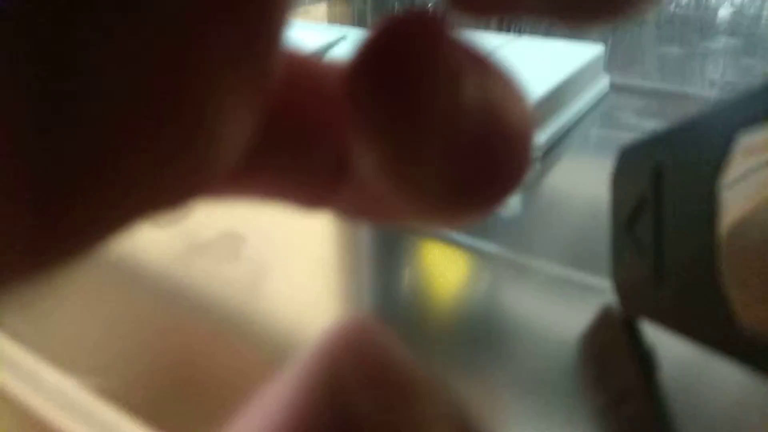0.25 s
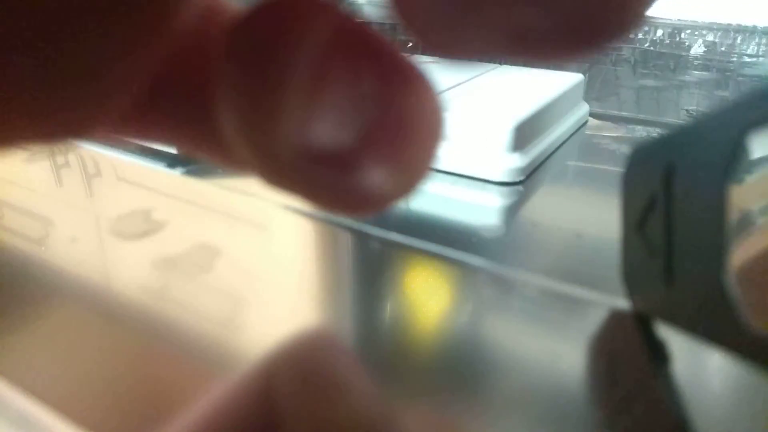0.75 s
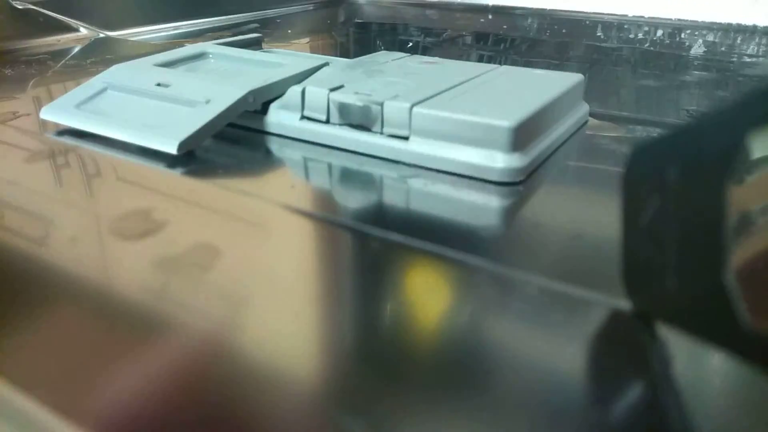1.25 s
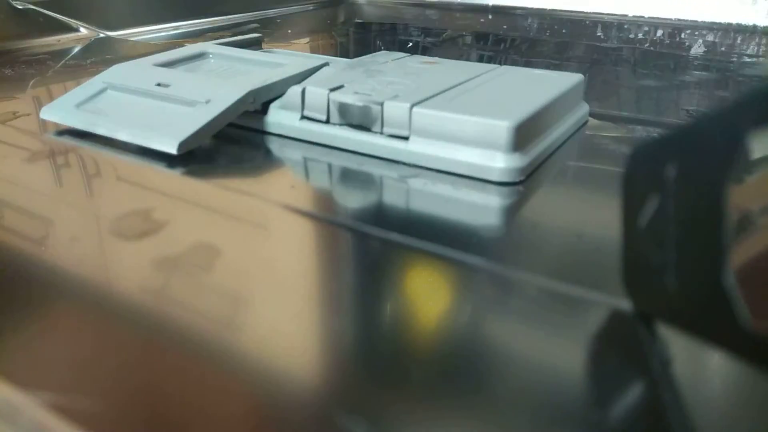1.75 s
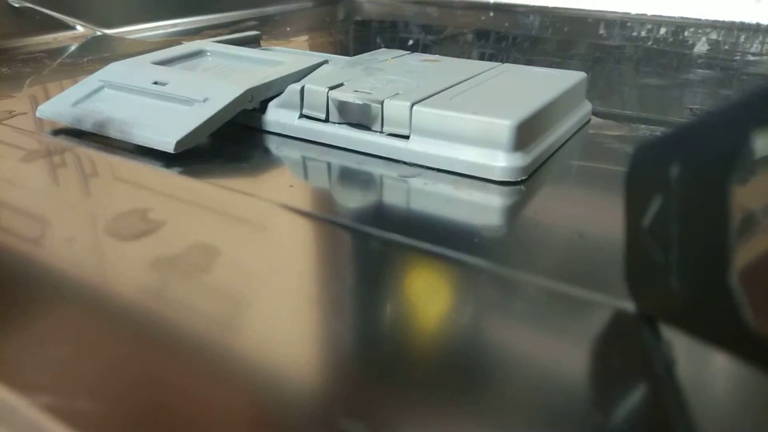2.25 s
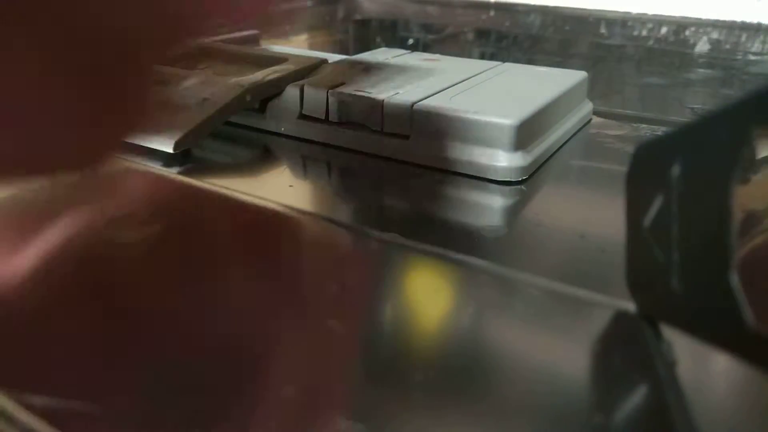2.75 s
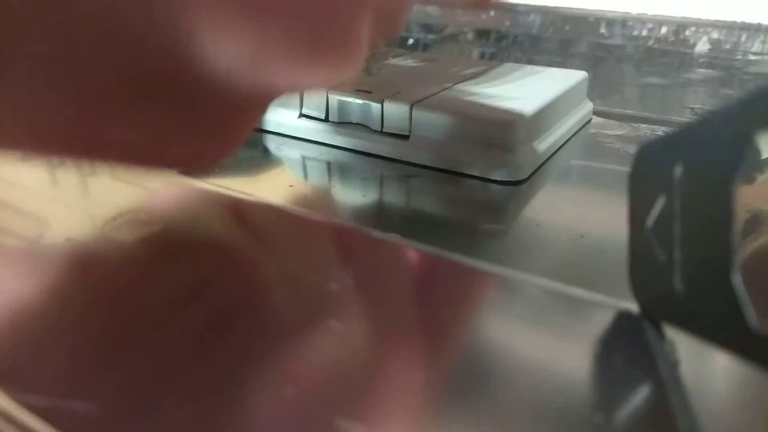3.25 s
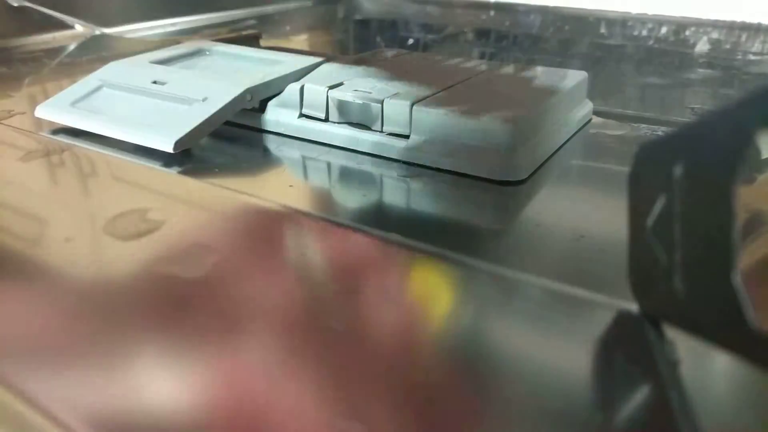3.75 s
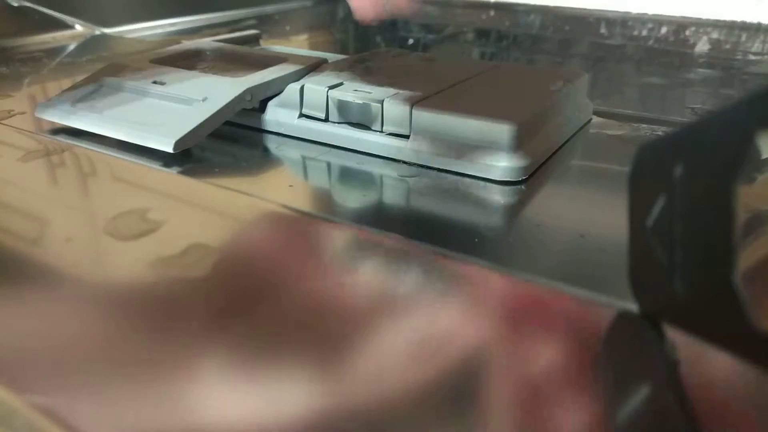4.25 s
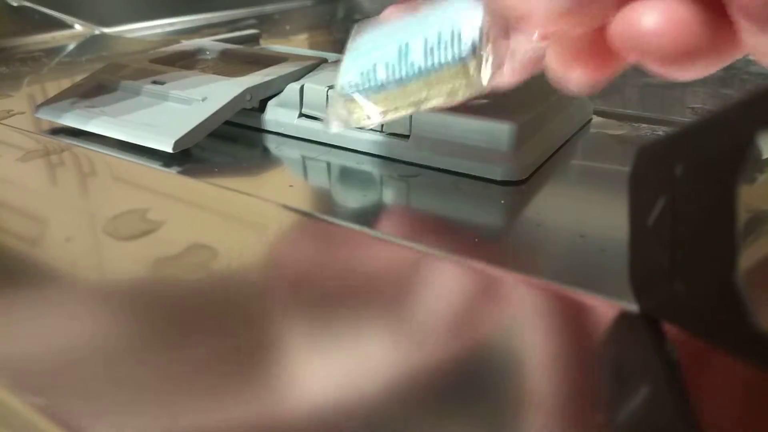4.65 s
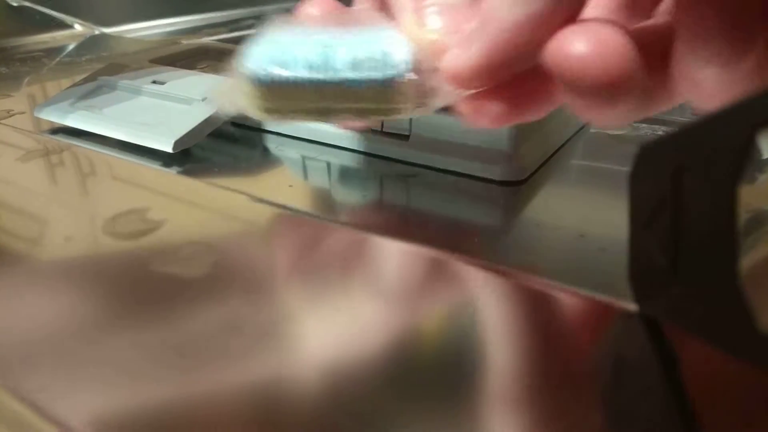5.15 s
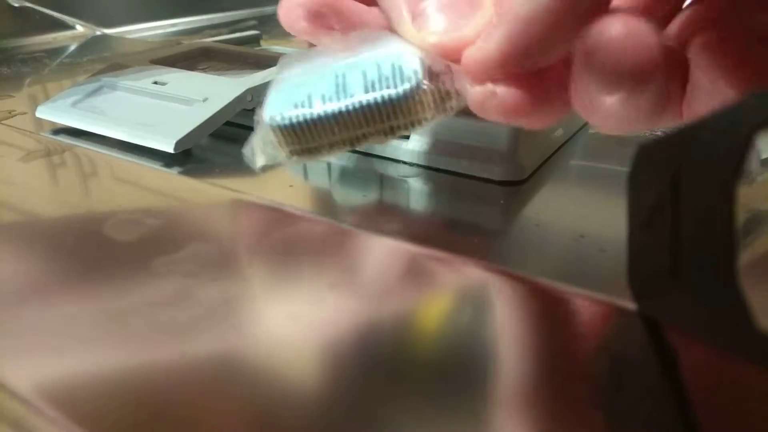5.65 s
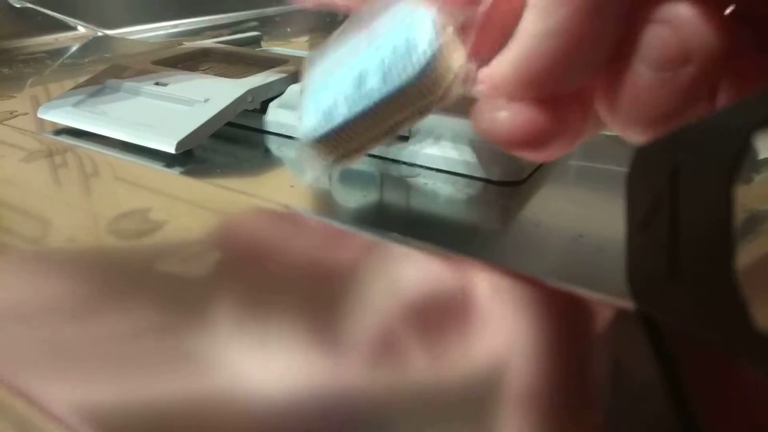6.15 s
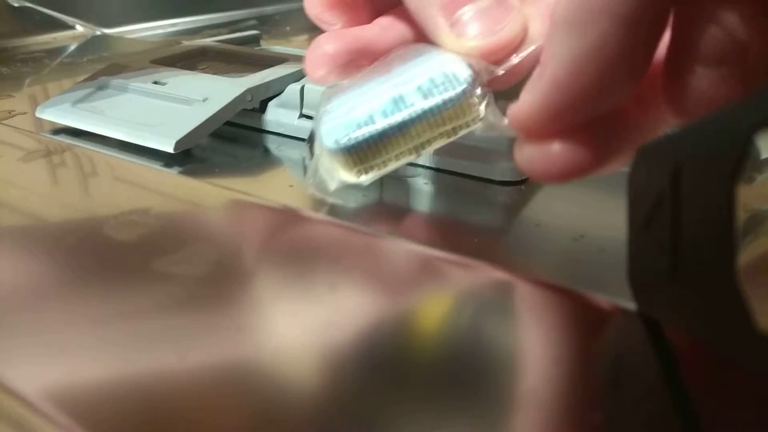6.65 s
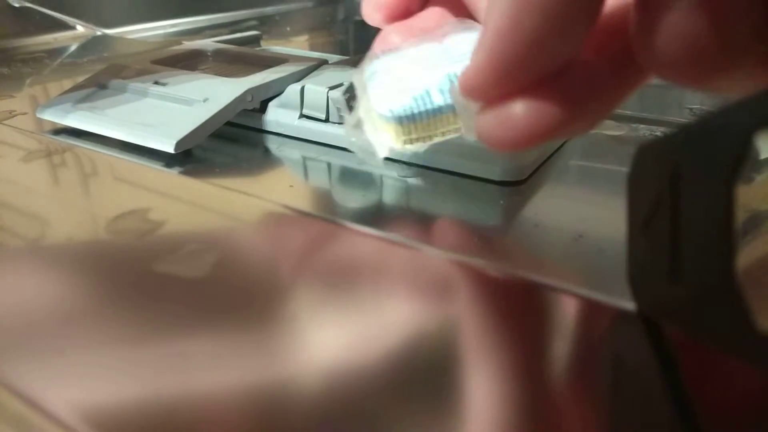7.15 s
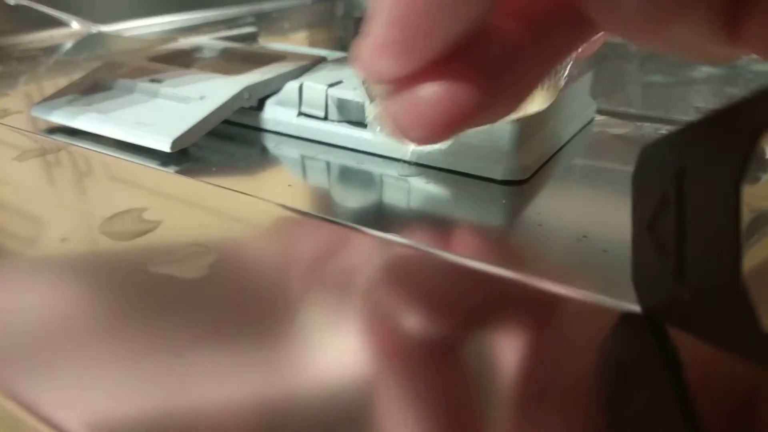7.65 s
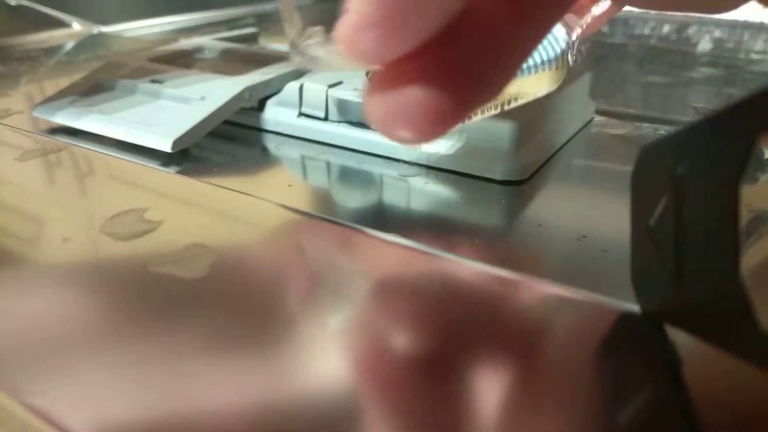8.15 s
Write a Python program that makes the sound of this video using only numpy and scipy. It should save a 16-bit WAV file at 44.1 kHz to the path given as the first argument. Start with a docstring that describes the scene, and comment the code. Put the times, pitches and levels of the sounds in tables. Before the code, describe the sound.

Close stereo handling noise opens: hard little knocks, rubbing and low thuds through a metal surface. It falls almost silent, then crisp film crackling starts, in clusters of sharp dry pops with fine rustle between and faint dull thumps below. It grows denser and louder toward the middle, bursts hardest around six seconds, then dies away with a few late small crackles in a short, bright indoor space.

```python
"""Fingers tap and rub a camera lying on a steel door: clicks, damped case modes, door bumps, noise strokes.
The hand rests, then leaves; soft puffs of narrow noise are scattered through the scene.
A thin plastic wrapper just beside is then torn and crumpled: creases buckle as bright noise snaps over a
dense fine crackle, with a low murmur, dull low thumps and a brief answer of steel and walls.
A faint whine, tone plus narrow hiss, lies under it all with a varying level."""
import sys
import numpy as np
from scipy import signal
from scipy.fft import rfft, irfft, next_fast_len
from scipy.io import wavfile
from scipy.ndimage import uniform_filter1d, map_coordinates

SR = 44100
rng = np.random.default_rng(int(sys.argv[2]) if len(sys.argv) > 2 else 0)


def file_out(sig):
    """Save sig as 16-bit WAV at sys.argv[1]."""
    # one column per channel
    cols = np.atleast_2d(sig).T
    # limit, then scale
    lim = np.clip(cols, -1, 1)
    pcm = np.round(lim * 32767).astype(np.int16)
    wavfile.write(sys.argv[1], SR, pcm)


N = 370881


def amp(db):
    """Decibels to amplitude gain."""
    return 10 ** (np.asarray(db) / 20)


def unit(x):
    """x scaled to rms 1."""
    return x / np.sqrt(np.mean(x ** 2) + 1e-20)


def along(points, hz):
    """Interpolate (f/Hz, value) points on a log frequency axis."""
    f, v = np.transpose(points)
    return np.interp(np.log(hz + 1), np.log(f + 1), v)


def level_curve(rows):
    """Level in dB per sample from (t/s, level/dB) rows; -140 dB outside them."""
    t, level_db = np.transpose(rows)
    return np.interp(np.arange(N) / SR, t, level_db, left=-140, right=-140)


def wobble(rate_hz):
    """Smooth random curve with rate_hz knots per second."""
    knots = rng.standard_normal(int(N * rate_hz / SR) + 4)
    return map_coordinates(knots, [np.arange(N) * rate_hz / SR])


def filtered(x, response):
    """x through a complex frequency response, zero-padded."""
    m = next_fast_len(N + SR // 2)
    return irfft(rfft(x, m) * response(np.fft.rfftfreq(m, 1 / SR)), m)[..., :N]


def gaussian_band(x, centre_hz, width_hz):
    """x in a Gaussian band, rms 1."""
    return unit(filtered(x, lambda f: np.exp(-((f - centre_hz) / width_hz) ** 2)))


def colour(x, points):
    """Minimum-phase filter of energy 1 with the given (f/Hz, level/dB) shape."""
    target = amp(along(points, np.fft.rfftfreq(4096, 1 / SR)))
    cepstrum = irfft(np.log(target + 1e-5))
    cepstrum[1:2048] *= 2  # fold to causal
    cepstrum[2049:] = 0
    h = irfft(np.exp(rfft(cepstrum)))
    return signal.oaconvolve(x, h[None] / np.linalg.norm(h), axes=1)[:, :N]


def pair(alike, patchy_db=0):
    """Two white noises of correlation alike; patches of random gain make short-lived resonances."""
    a, b = rng.standard_normal((2, N))
    angle = np.arccos(np.clip(alike, 0, 1)) / 2
    both = np.cos(angle) * a + np.sin(angle) * b * [[1], [-1]]
    if not patchy_db:
        return both
    z = signal.stft(both, nperseg=256)[2]
    field = uniform_filter1d(rng.standard_normal(z.shape), size=2, axis=1)
    field = uniform_filter1d(field, size=6, axis=2)
    return unit(signal.istft(z * amp(patchy_db * unit(field)), nperseg=256)[1][:, :N])


def wandering(x, depth_db):
    """Slowly drifting resonances: a random gain field, smooth over about 80 Hz and .3 s."""
    z = signal.stft(x, nperseg=2048)[2]
    field = uniform_filter1d(rng.standard_normal(z.shape[1:]), size=4, axis=0)
    field = uniform_filter1d(field, size=12, axis=1)
    return unit(signal.istft(z * amp(depth_db * unit(field)), nperseg=2048)[1][:, :N])


def sides(pan_db):
    """Left and right gains for a left-right difference (limited to 40 dB), power kept."""
    g = amp(np.multiply.outer([.5, -.5], np.clip(pan_db, -40, 40)))
    return g / np.sqrt(np.mean(g ** 2, axis=0))


KICK_DECAY_RATIO = .21  # kick t60 / ring t60


def bursts(t_s, db, pan_db, t60_s, kick=0):
    """Stereo envelope peaking at t_s: faint lead-in, steep rise, then a sharp kick over a slower decay."""
    t60_s, kick = np.clip(t60_s, .002, .06)[:, None], np.clip(kick, 0, 1)
    step = np.arange(-SR // 300, int(t60_s.max() * SR))
    fall_db = -120 * np.abs(step) / SR / t60_s  # amp() of this is power
    lead = .006 * amp(fall_db / 1.4)
    rise = amp(fall_db / 0.073) + lead
    decay = kick * amp(fall_db / KICK_DECAY_RATIO) + (1 - kick) * amp(fall_db)
    shape = np.where(step < 0, rise, decay)
    at = np.clip(np.round(t_s * SR).astype(int)[:, None] + step, 0, None).ravel()
    power = []
    for g in sides(pan_db):
        weights = (g * amp(db))[:, None] ** 2 * shape
        power.append(np.bincount(at, weights.ravel(), N + SR)[:N])
    return np.sqrt(power)


def crackle(count, spread_db, t60_s, share):
    """Envelope near rms 1: tiny bursts of random size take a share of the power, smooth hiss the rest."""
    u = rng.random((count, 2))
    size = np.minimum(rng.exponential(size=count), 4)
    tiny = bursts(u[:, 0] * N / SR, spread_db * size, 8 * (u[:, 1] - .5), np.array([t60_s]), kick=0.27)
    share = np.clip(share, 0, 1)
    return np.sqrt(share * unit(tiny) ** 2 + 1 - share)


def ring(t_s, db, hz, t60_s, attack_s, gains):
    """Damped sines, one per row, shared between the ports by gains."""
    out, t = np.zeros((2, N + SR)), np.arange(SR // 4) / SR
    for start, level, f, decay, lr in zip(t_s, db, hz, t60_s, gains.T):
        envelope = amp(level - 60 * t / decay) * (1 - np.exp(-t / attack_s))
        wave = envelope * np.sin(2 * np.pi * f * t)
        out[:, round(start * SR):][:, :len(t)] += lr[:, None] * wave
    return out[:, :N]


def gestures(t_s, hold_s, db, t60_s, rise_s):
    """Power of each gesture, one value per 32 samples: rise, hold, exponential release."""
    t = np.arange(0, N, 32) / SR - t_s[:, None]
    released_s = np.clip(t - rise_s - hold_s[:, None], 0, None)
    fall_db = 60 * released_s / np.clip(t60_s, .02, None)[:, None]
    return (np.clip(t / rise_s, 0, 1) ** 2 * amp(db[:, None] - fall_db)) ** 2


def summed(power, db=0):
    """Level in dB per sample of all gestures together, each with its own gain."""
    total = np.sum(power * np.reshape(amp(db) ** 2, (-1, 1)), axis=0) + 1e-14
    return np.interp(np.arange(N), np.linspace(0, N, len(total)), 10 * np.log10(total))


def place(power, pan_db):
    """Left-right difference in dB per sample: power-weighted mean over the gestures."""
    mean = pan_db @ power / (power.sum(axis=0) + 1e-14)
    return np.interp(np.arange(N), np.linspace(0, N, len(mean)), mean)


# whine level: t/s, level/dB
WHINE_LEVEL = [(0, -95), (1.2, -91.5), (1.5, -99), (1.6, -108), (1.66, -91), (1.8, -85), (7.3, -80.5),
               (7.6, -85.5), (7.85, -88.5), (8.41, -84)]
WHINE_CENTRE_HZ = 1004
WHINE_BAND_HZ, WHINE_WIDTH_HZ, WHINE_BAND_DB = 9750, 60, 7.5  # hiss band; level re tone


def whine():
    """Faint tone, unsteady in pitch and level, plus a thin band of hiss."""
    phase = 2 * np.pi * np.cumsum(WHINE_CENTRE_HZ + 4 * wobble(44)) / SR
    tone = amp(1.5 * wobble(10.0)) * np.sin(phase)
    band = gaussian_band(pair(0.82), WHINE_BAND_HZ, WHINE_WIDTH_HZ)
    return amp(level_curve(WHINE_LEVEL)) * (unit(tone) + amp(WHINE_BAND_DB) * band)


# reverberation: f/Hz, t60/s, relative level/dB
ROOM_DECAY = [(500, 0.14, 1), (2004, 0.16, 2), (3540, 0.18, -2.5), (6000, 0.19, -3), (9350, 0.15, -0.5),
              (16000, 0.15, 1)]


def room(x, count=3):
    """Noise tails dying by frequency; count random tails take turns, 30 switches a second."""
    turn = np.arange(N) * 30 // SR % count
    wet, (f, t60_s, db) = 0, np.transpose(ROOM_DECAY)
    for k in range(count):
        hz, t, z = signal.stft(rng.standard_normal((2, SR // 5)), SR, nperseg=128)
        fade_db = np.interp(hz, f, db)[:, None] - 60 * t / np.interp(hz, f, t60_s)[:, None]
        tail = signal.istft(z * amp(fade_db), SR, nperseg=128)[1]
        tail = tail / np.linalg.norm(tail[0])
        wet = wet + signal.oaconvolve(x * (turn == k), tail, axes=1)[:, :N]
    return np.pad(wet, ((0, 0), (160, 0)))[:, :N]  # 160-sample pre-delay


# dull low thumps, mostly under loud snaps: t/s, level/dB before -3 dB trim
THUMP_EVENTS = [(2.139, -64), (2.409, -52), (3.119, -52), (3.199, -62), (3.329, -61), (4.099, -46),
                (4.589, -54), (4.929, -61), (5.419, -52), (5.469, -52), (6.004, -43.5), (6.029, -56),
                (6.149, -58), (6.279, -51), (6.4, -56), (6.479, -45), (6.969, -47), (7.039, -48),
                (7.099, -60), (7.944, -57)]
# thump spectrum: f/Hz, relative level/dB
THUMP_SHAPE = [(20, -25), (50, -9), (120, -0.5), (250, 1), (500, -2), (900, -17.5), (2000, -79.5)]


def thumps():
    """Short dull low pushes: a smooth pulse through a low-pass shape, alike at both ports."""
    t_s, db = np.transpose(THUMP_EVENTS)
    return colour(bursts(t_s, db - 3, 0 * t_s, np.array([.003])), THUMP_SHAPE)


# dull bumps through the door: t/s, level/dB before mode trim, f/Hz of lower mode, t60/s of lower mode
BUMP_EVENTS = [(0.384, -23, 163, 0.038), (0.436, -41, 249, 0.072), (0.453, -35, 179, 0.046),
               (0.489, -68.5, 243.6, 0.47), (3.355, -47, 197, 0.064), (4.03, -53, 137, 0.18)]


def bumps():
    """Soft pushes set two damped modes of the door panel swinging, alike at both ports."""
    t_s, db, hz, t60_s = np.transpose(BUMP_EVENTS)
    lr = sides(0 * t_s)
    lower = ring(t_s, db + 14.0, hz, t60_s, 0.00675, lr)
    upper = ring(t_s, db + 0.54, 1.6 * hz, 1.9 * t60_s, 0.012, lr)
    return lower + upper


# soft puffs of narrow noise: t/s of centre, f/Hz of centre, width/Hz, level/dB, length/s
PUFF_EVENTS = [(1.01, 690, 200, -70.5, 0.079), (1.25, 1000, 349.5, -85, 0.18),
               (1.354, 548, 120.4, -87.5, 0.13), (2.326, 594, 130, -62.5, 0.051),
               (2.868, 1800, 300, -61.5, 0.064), (7.569, 2310, 399, -72.5, 0.042)]


def puffs():
    """Short Gaussian swells of narrow noise."""
    t, noise, out = np.arange(N) / SR, pair(0.25), 0
    for t_s, hz, width_hz, db, length_s in PUFF_EVENTS:
        swell = np.exp(-((t - t_s) / length_s) ** 2)
        out = out + amp(db) * swell * gaussian_band(noise, hz, width_hz)
    return out


# finger on the case, spectrum (strokes and taps): f/Hz, relative level/dB per Hz
SKIN_SHAPE = [(240, -31.5), (400, -7), (526, -7), (787, -1.5), (1670, -8), (3450, -15), (5000, -18),
              (6500, -31.5), (11000, -120)]
# finger strokes: start t/s, hold/s, hiss level/dB, release t60/s, left-right/dB (scrape),
# scrape level/dB re hiss, rumble level/dB re hiss
STROKE_EVENTS = [(0.017, 0.02, -52, 0.093, 7, -3.5, -11), (0.271, 0.087, -45, .1, 3, 1.5, -9),
                 (0.372, 0.0062, -34.5, 0.17, -2, -2.5, 3.5), (0.421, 0.021, -39, 0.068, 0, -3, 7.5),
                 (.47, 0.037, -61.5, 0.55, 1, -3.5, 8), (0.608, 0.12, -54.5, 0.17, 9, -10.5, -13),
                 (0.668, 0.029, -45, 0.11, 39, 2, -6), (.89, 0.064, -56.5, 0.24, -1, -14, -17)]
# hiss of sliding skin: f/Hz, relative level/dB per Hz
SLIDE_SHAPE = [(2350, -27), (4000, -16.5), (6000, -10.5), (7860, -9.5), (8700, -5.5), (14900, -15.5),
               (15900, -37), (16500, -51)]
# hiss of the hand resting, then leaving: t/s, level/dB
REST_LEVEL = [(0, -60), (.87, -62), (1.0, -63.5), (1.1, -76), (1.3, -79.5), (1.6, -90.5), (1.75, -93)]
# resting hiss spectrum: f/Hz, relative level/dB per Hz
REST_SHAPE = [(2350, -28), (3500, -17.5), (5500, -20.5), (7000, -18.5), (9000, -4), (11000, -8.5),
              (12500, -14), (14900, -16), (16500, -49.5)]
# door under a moving hand: f/Hz, relative level/dB per Hz
RUMBLE_SHAPE = [(35, -69.5), (60, -34.5), (97, -15.5), (172, -4), (213, 0.5), (407, -11), (477, -10.5),
                (900, -19), (1170, -47), (1980, -120)]
STROKE_RISE_S = 0.011
REST_SCRAPE_DB, REST_RUMBLE_DB = -11, -12  # re resting hiss


def rub():
    """Skin slips on the case: grainy hiss, a scrape panned by stroke, and door rumble."""
    t_s, hold_s, db, t60_s, pan_db, scrape_db, rumble_db = np.transpose(STROKE_EVENTS)
    power = gestures(t_s, hold_s, db, t60_s, STROKE_RISE_S)
    rest_db = level_curve(REST_LEVEL)

    def level(stroke_re_db, rest_re_db):
        return np.hypot(amp(summed(power, stroke_re_db)), amp(rest_db + rest_re_db))

    share = (summed(power, scrape_db) + 79.0) / 75  # stronger scrape, more crackle
    grain = crackle(count=3000, spread_db=-3.0, t60_s=0.009, share=share)
    slide = amp(summed(power)) * colour(grain * pair(0.074), SLIDE_SHAPE)
    rest = amp(rest_db) * colour(pair(0.1, patchy_db=4), REST_SHAPE)
    scrape = level(scrape_db, REST_SCRAPE_DB) * sides(place(power, pan_db))
    scrape = scrape * colour(grain * pair(0.17), SKIN_SHAPE)
    rumble = level(rumble_db, REST_RUMBLE_DB) * colour(pair(0.7), RUMBLE_SHAPE)
    return slide + rest + scrape + rumble


# taps on the case: t/s, level/dB before part trims, f/Hz of ring, left-right/dB, nominal t60/s,
# click level/dB re level, click left-right/dB
TAP_EVENTS = [(0.0226, -35.5, 1010, 30, 0.018, 3, 26), (0.0246, -22.5, 875, 40, 0.0097, -3, 24),
              (0.098, -34.5, 730, 25.0, 0.014, -7, -3), (0.2695, -12.5, 1110, 16.5, 0.015, 3.5, -13),
              (0.324, -29, 560, 22, 0.006, -3.5, -16), (0.391, -21, 533, 31, 0.0024, -10, -19.5),
              (0.45, -18.5, 660, 26, 0.0051, -16, -16), (0.646, -45, 840, 25, 0.0096, 1, -15),
              (0.883, -42, 920, 11, 0.0056, 2, -17), (3.119, -37.5, 537, 25, 0.014, 8, -7)]
# case modes: multiple of ring f, level/dB
CASE_MODES = [(.7, 4.5), (1.1, 1.5), (1.45, 7)]
# fingertip click spectrum: f/Hz, relative level/dB
CLICK_SHAPE = [(1500, -45.5), (3000, 3.5), (5000, -0.5), (9000, -1), (14000, -18), (17000, -42)]


def taps():
    """A fingertip clicks (noise); the case rings (damped sines) and thuds (noise), mostly at the near port."""
    t_s, db, hz, pan_db, t60_s, click_db, click_pan_db = np.transpose(TAP_EVENTS)
    case = 0
    for multiple, gain_db in CASE_MODES:
        case = case + ring(t_s, db + gain_db, multiple * hz, 0.84 * t60_s, 0.00043, sides(pan_db))
    thud = bursts(t_s + 0.00074, db - 2, pan_db, 0.88 * t60_s) * pair(1.0)
    click = bursts(t_s - .0003, db + click_db, click_pan_db, 0.5 * t60_s, kick=0.37)
    click = click * np.sign(pair(0.078))
    return case + colour(thud, SKIN_SHAPE) + colour(click, CLICK_SHAPE)


# squeezes of the film: start t/s, hold/s, treble level/dB, release t60/s, left-right/dB
SQUEEZE_EVENTS = [(1.622, 0.011, -62.5, 0.27, -8), (1.769, 0.061, -43, 0.27, -5),
                  (1.928, 0.066, -39.5, 0.83, -2), (2.22, 0.019, -45, .2, -3), (2.254, 0.056, -40, 0.5, -2),
                  (2.382, 0.26, -50.5, 0.81, -1.5), (2.68, 0.022, -47.5, .2, -1),
                  (2.706, 0.016, -42, 0.78, -1.5), (2.871, 0.039, -39, 0.35, 1),
                  (3.08, 0.026, -46.5, 0.57, -3), (3.185, 0.14, -31.5, 0.63, -0.5),
                  (3.225, .005, -34, .15, 0), (3.58, 0.075, -39, 0.95, 0), (3.844, 0.37, -43, 0.35, -0.5),
                  (4.094, 0.0051, -31, 0.23, 0), (4.158, 0.026, -41.5, .65, 1),
                  (4.403, 0.053, -43, 0.47, 0), (4.565, 0.025, -28.5, 0.29, 0.5),
                  (4.755, 0.079, -45.5, 0.3, -0.5), (4.91, 0.066, -38, 0.32, 0),
                  (5.346, 0.046, -42, 0.66, 5.5), (5.47, 0.08, -44.5, 0.65, 0),
                  (5.76, 0.063, -48, 0.405, -0.5), (5.885, 0.14, -37.5, 0.34, 13),
                  (5.958, 0.13, -26, 0.3, -4), (6.254, 0.022, -37.5, 0.18, 8),
                  (6.388, 0.19, -46, 0.83, -0.5), (6.687, 0.28, -56.5, .5, 2),
                  (6.947, 0.034, -42.5, 0.98, 1), (7.298, 0.09, -59, 0.8, -0.5),
                  (7.572, 0.066, -65.5, 0.27, -5), (7.866, 0.074, -66.5, 0.41, 1),
                  (7.936, 0.01, -42.5, 0.51, -0.5), (8.233, 0.017, -71, 0.25, -4),
                  (8.29, .03, -64.5, 1.1, 0)]
# film treble spectrum: f/Hz, relative level/dB per Hz
FILM_SHAPE = [(2400, -31), (4000, -10.5), (5500, -8), (7200, -6), (9100, 0.5), (11700, -2), (15200, -5.5),
              (16500, -39.5)]
# film body spectrum: f/Hz, relative level/dB per Hz
BODY_SHAPE = [(290, -49), (500, -5), (1440, -5.5), (2040, -4), (2730, -3.5), (3850, -5.5), (4330, 1.5),
              (5000, -17), (6500, -32.5), (11000, -120)]
# low background murmur level: t/s, level/dB
MURMUR_LEVEL = [(1.74, -99.5), (1.83, -66), (1.96, -70.5), (2.72, -65), (2.89, -61), (3.8, -70),
                (4.02, -58.5), (4.17, -55.5), (4.43, -60.5), (4.66, -74.5), (4.99, -82), (5.38, -63.5),
                (5.97, -64), (6.12, -75), (6.35, -66.5), (6.55, -61.5), (6.94, -65.5), (7.22, -69),
                (7.59, -92.5), (7.92, -98), (8.02, -65), (8.15, -79), (8.41, -104)]
# low background murmur spectrum: f/Hz, relative level/dB per Hz
MURMUR_SHAPE = [(18, -55), (30, -22), (86, -29), (150, -7), (200, -3.5), (240, 3.5), (290, -4), (346, 0),
                (414, -4), (462, 1.5), (575, -11), (800, -14), (1040, -22), (1760, -120)]
SQUEEZE_RISE_S = 0.031
BODY_DB, BODY_SLOPE = -55, 0.77  # body at treble -40 dB; dB per treble dB
MURMUR_RE_TREBLE_DB = -38  # share of the murmur that tracks the treble


def rustle():
    """Gentle creep is smooth hiss, firm squeezing crackles; a low murmur rises and falls with the rustle."""
    t_s, hold_s, db, t60_s, pan_db = np.transpose(SQUEEZE_EVENTS)
    power = gestures(t_s, hold_s, db, t60_s, SQUEEZE_RISE_S)
    treble_db = summed(power)
    body_db = BODY_DB + BODY_SLOPE * (treble_db + 40)
    firm = np.clip((treble_db + 40.0) / 22, 0, 1)
    where = sides(place(power, pan_db))
    grain = where * crackle(count=2500, spread_db=4.0, t60_s=0.012, share=firm)
    ticks = where * crackle(count=1100, spread_db=2.5, t60_s=0.009, share=.3 + .6 * firm)
    treble_gain = amp(treble_db + (-0.83 + 2.0 * firm) * wobble(46))
    treble = treble_gain * colour(grain * pair(0.11, patchy_db=6.0), FILM_SHAPE)
    body_gain = amp(body_db + (1.5 + 8.1 * firm) * wobble(30))
    body = body_gain * colour(ticks * pair(0.13), BODY_SHAPE)
    murmur_gain = np.hypot(amp(level_curve(MURMUR_LEVEL)), amp(treble_db + MURMUR_RE_TREBLE_DB))
    murmur_gain = murmur_gain * amp(1.9 * wobble(5.3))
    murmur = murmur_gain * colour(wandering(pair(0.84), depth_db=1.94), MURMUR_SHAPE)
    return treble + body + murmur


TINT_LO_HZ, TINT_HI_HZ = 4010, 14500
TINT_T60_S = .011  # times .5 to 1.5 at random


def tints(t_s, db, pan_db, count=4):
    """Short damped sines at random high pitches give each snap a tonal tint."""
    u, t = rng.random((len(t_s), count, 3)), np.arange(SR // 40) / SR
    hz = TINT_LO_HZ * (TINT_HI_HZ / TINT_LO_HZ) ** np.sqrt(u[..., :1])  # favours high pitches
    t60_s = TINT_T60_S * (.5 + u[..., 2:])
    envelope = amp(-12 * u[..., 1:2] - 60 * t / t60_s)
    wave = np.sum(envelope * np.sin(2 * np.pi * hz * t), axis=1)
    wave = wave * (1 - np.exp(-t / .0002))
    at = (np.round(t_s * SR).astype(int)[:, None] + np.arange(len(t))).ravel()
    out = []
    for g in sides(pan_db):
        out.append(np.bincount(at, ((g * amp(db))[:, None] * wave).ravel(), N + SR)[:N])
    return np.array(out)


# buckling creases: t/s, peak level/dB, top, middle and low level/dB re peak, left-right/dB;
# band levels and left-right before the trims in snaps()
CREASE_EVENTS = [(1.7804, -30.5, -17, -38, -33, -14), (1.793, -45, -15, -29, -33, -10),
                 (1.805, -51, -20, -28, -26, -8), (1.8263, -32.5, -21, -18, -18, -6),
                 (1.8452, -30.5, -16, -30, -21, -3), (1.9256, -34, -6, -34, -36, -9),
                 (1.9636, -28, -8, -26, -43, -16), (1.9875, -25, -16, -24, -34, -11),
                 (2.004, -19.5, -25, -18, -33, -7), (2.0138, -20, -8, -16, -35, -17),
                 (2.0198, -17.5, -1, -23, -29.5, -6), (2.058, -21, 4, -39, -44, -9),
                 (2.0739, -24.5, -12, -25, -23, -6), (2.1192, -13, -20, -26.5, -35, -3),
                 (2.125, -10.5, -14.5, -29, -39, -15), (2.143, -9, -21, -30, -57, -8),
                 (2.397, -19.5, -14, -18, -32, -7), (2.403, -11.5, -9.5, -24, -41, -9),
                 (2.4141, -11.5, -28, -23, -26.5, -2.5), (2.7211, -43, -10, -12, -15, -5),
                 (2.729, -43.5, -14, -17, -6.5, -9), (2.737, -42, -14, -7, -19, -3),
                 (2.801, -21.5, -10, -17, -43, -6), (2.908, -39.5, 3, -9, -8, -11),
                 (2.967, -43, -14, -7, -7, 1), (3.0576, -18.5, -13, -17, -30, -0.5),
                 (3.121, -21.5, -7.5, -21, -22, 3), (3.1374, -46, -14, -24, -33, 0),
                 (3.2021, -7, -9.5, -19.5, -32, 3), (3.212, -20, -7, -7, -10.5, -6),
                 (3.2312, -31, -6, -26, -36, 0), (3.239, -9, -12, -25, -38, -4),
                 (3.2572, -27, -12, -20, -41, -0.5), (3.271, -26.5, -6, -10, -37, 5),
                 (3.2782, -15.5, -18, -16, -44, -8), (3.288, -17, -6, -15, -32, 3),
                 (3.307, -19.5, -3, -14.5, -26, 0), (3.3255, -9, -10, -20, -30, -10),
                 (3.3295, -18, -5, -22, -39, 6), (3.334, -21, -3, -31, -26.5, 12),
                 (3.3428, -18, -8, -29, -30, 4), (3.347, -14, -9, -25, -29, 4),
                 (3.352, -21, -11, -29, -25, 7.5), (3.3588, -37, 4, -10, -19, 2.5),
                 (3.3914, -10.5, -6, -13.5, -27, -3), (3.399, -19, 0.5, -35, -35, 9),
                 (3.41, -23, -16, -33, -43, -7), (3.438, -33, 1, -7, -20, 2),
                 (3.475, -11, -10.5, -25, -28.5, -1.5), (3.489, -27, -3, -37, -49, 17),
                 (3.552, -7.5, -17, -28.5, -51, 6.5), (3.563, -32, 1, -22, -26, -4),
                 (3.5908, -10.5, -0.5, -17.5, -45, -2), (3.607, -20.5, -1, -32, -40, -4),
                 (3.615, -15.5, -11, -31, -40.5, 15), (3.6455, -18, -10, -18, -41, 17),
                 (3.6505, -15.5, -6, -14, -56, -3), (3.681, -28, 8, -17, -34, 8),
                 (3.685, -15, -1.5, -19, -49, -17), (3.695, -10.5, -10, -16, -38.5, 7),
                 (3.7199, -17.5, -5, -18.5, -34, 3), (3.8223, -19.5, -12, -13.5, -20.5, -5),
                 (3.8629, -11.5, -11.5, -20, -31, 0), (3.88, -21.5, -14, -22, -34, -7.5),
                 (3.904, -29, -7.5, -24, -16, 3), (3.921, -16.5, -5, -11.5, -23.5, -8),
                 (3.9473, -22, -14, -20, -26.5, -8), (3.9584, -10, -15, -31, -49, -3.5),
                 (4.037, -27.5, -23, -18, -32.5, -2), (4.0858, -11, -5, -41, -49, 2),
                 (4.0966, -11, -11, -24.5, -27, -2), (4.1021, -5.5, -12, -25, -41, -3),
                 (4.1258, -12.5, -32, -32.5, -32, -18), (4.1848, -16.5, -8, -19, -24, 7),
                 (4.2275, -24.5, -22, -10.5, -19, -10), (4.2547, -27.5, -12, -16, -21, -4),
                 (4.42, -46, -11, -27, -11, -7.5), (4.444, -33.5, -5.5, -21, -16.5, -6.0),
                 (4.456, -31, -13, -23, -24, -10), (4.466, -35.5, -13.5, -23, -19.5, -1),
                 (4.4935, -39, -13, -4, -2.5, -4), (4.5376, -24.5, -3, -15, -19, -8.5),
                 (4.5443, -17, -8.5, -8.5, -22.5, 32), (4.5563, -5.5, -7.5, -19.5, -30, 0.5),
                 (4.568, -10.5, -13.5, -20, -32.5, 2), (4.577, -23, -9.5, -19.5, -31, -7),
                 (4.5904, 0, -26, -23, -27.5, -0.5), (4.597, -28, -4.5, -15.5, -33, 1),
                 (4.6072, -9.5, -2, -24, -48, -2), (4.616, -8.5, -16.5, -21.5, -44, -6.5),
                 (4.6319, -13.5, -6.5, -15, -23, -11), (4.7122, -7, -9, -25, -31.5, 1.5),
                 (4.7237, -31.5, -22, -26.5, -33, -6.5), (4.742, -20, -10, -16, -20, -14),
                 (4.753, -5, -13.5, -26, -44.5, 0.5), (4.766, -26, -13.5, -28, -31, 0),
                 (4.823, -25.5, -14, -25.5, -36, 9.5), (4.83, -25.5, -14, -29, -29, -3.5),
                 (4.8398, -20.5, -8, -36, -41.5, 2), (4.9093, -27, -21.5, -11, -21, -5),
                 (4.9259, -3, -8, -20.5, -34, 2.5), (4.9332, -21, -17.5, -30.5, -28, -4.5),
                 (4.942, -11.5, -22.5, -25.5, -27, -8.5), (4.9484, -38, -15, -24.5, -29.5, -2.5),
                 (5.047, -20, -12, -23, -22.5, -4), (5.0886, -19.5, -18, -13.5, -20.5, 4),
                 (5.1207, -41, -8.5, -23, -16, -2), (5.134, -20, -10, -22, -26.5, -5),
                 (5.136, -18, -15, -8.5, -21, -4.5), (5.1704, -23.5, -16, -22, -34, 1.5),
                 (5.2066, -24.5, -26, -12, -14, -3), (5.217, -24.5, -11, -11.5, -24, -4),
                 (5.234, -16, -9.5, -20.5, -30.5, -3), (5.2868, -9.5, -9, -24, -39, -5),
                 (5.325, -12, -19.5, -28, -50, -1), (5.351, -28, -7.5, -24, -22, -7),
                 (5.3771, -21.5, -14, -4.5, -20.5, -4), (5.42, -4, -18.5, -25.5, -35.5, -3.5),
                 (5.4739, -6, -10.5, -13.5, -26.5, 4), (5.4914, -10.5, -2, -37.5, -32, 4),
                 (5.5369, -13, -3, -18, -32.5, -2), (5.64, -29, -27, -16.5, -24, 0),
                 (5.7309, -10.5, -12, -7, -22.5, -7), (5.8418, -29, -11, -13, -17.5, -1),
                 (5.849, -33, -12, -15, -24.5, -1.5), (5.8613, -31, -17, -12.5, -7, -3),
                 (5.8673, -18, -3.5, -16, -35.5, 0.5), (5.8858, -7.5, -8, -23, -35, -1.5),
                 (5.9102, -12.5, -1, -12.5, -23.5, -3.5), (5.9207, -15.5, -10.5, -10.5, -18, 2.5),
                 (5.9294, -37.5, -6.5, -15, -22, -0.5), (5.9772, -25.5, -16.5, -12.5, -31, -8.5),
                 (5.989, -9.5, -14.5, -16.5, -16.5, -1), (5.9962, -11.5, -3.5, -12.5, -28.5, -9.5),
                 (6.005, -12.5, -16.5, -13, -14.5, 1), (6.0098, -8.5, -2, -10.5, -23, -2.5),
                 (6.021, -0.5, -13, -16.5, -42.5, 2.5), (6.0313, -4, -24.5, -22, -41.5, 3.5),
                 (6.04, -12, -10, -17, -43, -1), (6.0476, -2, -5, -18, -38, -4),
                 (6.063, 1, -20, -23.5, -35, -9.5), (6.08, -11.5, -8, -19.5, -40, 4.5),
                 (6.1081, -5.5, -10.5, -22.5, -58, 8.5), (6.1195, -14, -15, -15, -45, 1),
                 (6.135, -26.5, 2, -6, -28, -10), (6.145, -17.5, -22.5, -4, -45, 14),
                 (6.148, -9.5, -13, -20, -40, -1), (6.2162, -29.5, -4.5, -7, -28.5, -5),
                 (6.229, -25, -4, -16, -23, 8), (6.241, -16.5, -11, -11, -28.5, -12),
                 (6.269, -12, -14, -17.5, -25, 13), (6.2793, -8.5, -6.5, -18, -48, -6.5),
                 (6.2912, -12.5, -9, -27, -45, 5), (6.3051, -25, -10, -4, -18.5, 1),
                 (6.327, -26, -7, -13, -27, 1), (6.362, -14, -11, -20, -41, -1),
                 (6.379, -21.5, -8.5, -24, -24.5, -1), (6.3974, -9.5, -10, -14.5, -25, -6.5),
                 (6.412, -22, -10, -28, -35, 2), (6.424, -15, -18, -36, -32, 4),
                 (6.4521, -25, -12, -18, -27.5, 1), (6.4668, -31, -8, -30, -33, -2),
                 (6.4762, -15, -16, -14.5, -24, -4), (6.4821, -9, -4.5, -27, -42, 4),
                 (6.499, -13, -17, -52, -63, 0), (6.554, -24, -10, -22, -24.5, 2),
                 (6.582, -28, -5, -23, -36, 1), (6.599, -22.5, -11, -20, -23, 0),
                 (6.608, -33, -10, -10, -20, 4), (6.6135, -13, -11.5, -13, -21, 2),
                 (6.643, -24, -1, -9.5, -19.5, 1), (6.7873, -43, -15, -12.5, -16, 10),
                 (6.8674, -46.5, -15, -6, -3, 3), (6.8857, -32, -6.5, -7.5, -18, 3),
                 (6.942, -4.5, -14, -34, -42, 2), (6.964, -19, -21.5, -8.5, -17, -2),
                 (6.9742, -5.5, -12, -21.5, -39.5, 2), (7.033, -26.5, -12, -26, -12, -14),
                 (7.0435, -6.5, 1, -19, -32.5, -2.5), (7.0547, -18, -10.5, -31, -37, 7),
                 (7.099, -14.5, -1.5, -16.5, -24, -7.5), (7.111, -13.5, -8.5, -26, -39, 7),
                 (7.292, -28, 1, -17.5, -29, -1), (7.358, -46, -4, -23, -30, 0),
                 (7.371, -52, -4, -24, -30, 0), (7.458, -51, -7, -15, -33, 4),
                 (7.647, -60, 0, -21, -30, -1), (7.871, -41.5, -21, -9.5, -14.5, -8),
                 (7.951, -18, -2.5, -13.5, -25, -6), (7.9555, -20.5, -9, -7.5, -13, -1),
                 (7.9678, -16, -19, -8.5, -24, 6), (8.237, -41.5, -11, -15, -22, -2),
                 (8.2472, -38.5, -5, -15, -22.5, -8), (8.2822, -26.5, -0.5, -21, -32, 4)]
# snap band spectra: f/Hz, relative level/dB
TOP_SHAPE = [(9000, -42.5), (11000, 10.5), (13000, 10), (15500, 4), (16800, -23.5)]
HIGH_SHAPE = [(3600, -39.5), (4800, -18.5), (7000, -6.5), (9000, 1), (11000, -1.5), (13500, -55.5)]
MIDDLE_SHAPE = [(1700, -37), (2500, -15), (4000, -8.5), (5600, -12), (7500, -42)]
LOW_SHAPE = [(60, -59.5), (250, -26), (600, -12.5), (1800, -3.5), (2600, -0.5), (3600, -73)]
SNAP_T60_S, SNAP_SCATTER = 0.011, 0.18  # median before band factors; log spread over creases
SNAP_DELAY_S, SNAP_KICK = 0.0011, 0.74  # table time to snap peak; kick share of peak power
TINT_DB = -15.5  # re peak, before random cut of up to 12 dB


def snaps():
    """A buckling crease kicks the film and shakes it for milliseconds, in a colour of its own: bright, dull."""
    t_s, db, top_db, middle_db, low_db, pan_db = np.transpose(CREASE_EVENTS)
    t60_s = SNAP_T60_S * np.exp(SNAP_SCATTER * rng.standard_normal(len(t_s)))
    peak_s = t_s + SNAP_DELAY_S

    def shake(gain_db, pan_scale, t60_scale):
        return bursts(peak_s, db + gain_db, pan_scale * pan_db, t60_scale * t60_s, SNAP_KICK)

    top = colour(shake(top_db + 9, 0.56, 0.85) * np.sign(pair(0.16)), TOP_SHAPE)
    high = colour(shake(-0.17, 1.0, 1) * np.sign(pair(0.58, patchy_db=5.5)), HIGH_SHAPE)
    middle = colour(shake(middle_db + 6.0, 0.99, 1.53) * np.sign(pair(0.41)), MIDDLE_SHAPE)
    low = colour(shake(low_db + 10.0, 0.16, 1.49) * np.sign(pair(0.79)), LOW_SHAPE)
    return top + high + tints(peak_s, db + TINT_DB, pan_db), middle + low


# ports hear differently: f/Hz, left-right/dB
PORT_LEAN = [(500, -0.5), (3000, 1.5), (8000, -5.5), (15000, 8.5)]
LEFT_LAG_S = 0.000156  # right port is nearer to the wrapper


def ports(f):
    """Port responses to the wrapper: left-right gain over frequency, left delayed."""
    lag_s = LEFT_LAG_S * np.array([[1], [0]])
    return sides(along(PORT_LEAN, f)) * np.exp(-2j * np.pi * f * lag_s)


def scene():
    """Wrapper and room through the ports, plus hands, door, thumps, puffs and whine."""
    (bright, dull), touch = snaps(), taps()
    echo = room(amp(-7.0) * bright + amp(-9.0) * dull + amp(-22.0) * touch)
    film = bright + dull + rustle() + echo
    return filtered(film, ports) + touch + bumps() + thumps() + rub() + puffs() + whine()


BOTTOM_HZ, TOP_HZ = 45.34, 16600  # microphone bass corner, band limit


def record(dry):
    """Peaks saturate, bass thins out at first order, and a steep cut ends the band."""
    dry = dry / (1 + np.abs(dry) ** 6) ** (1 / 6)
    return filtered(dry, lambda hz: 1j * hz / (BOTTOM_HZ + 1j * hz) / (1 + (hz / TOP_HZ) ** 160))


dry = scene()
out = record(dry)
file_out(out)
```